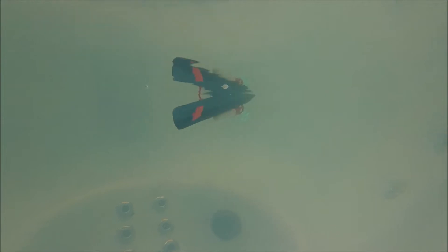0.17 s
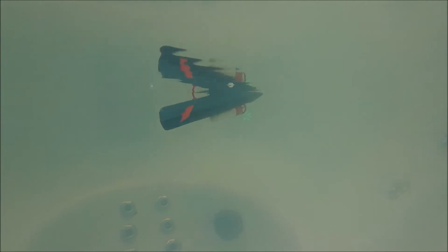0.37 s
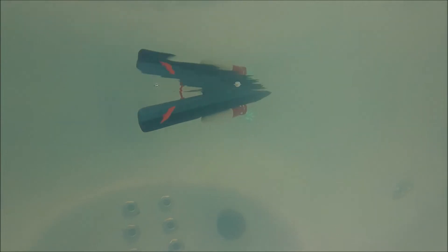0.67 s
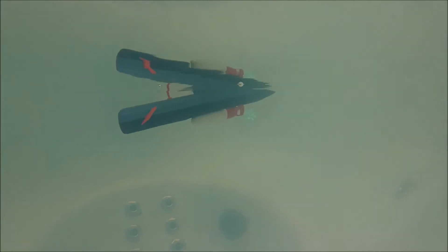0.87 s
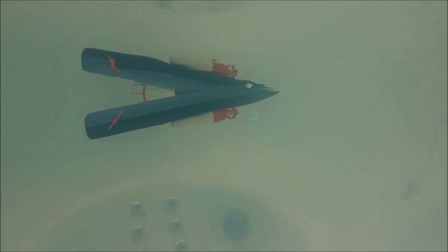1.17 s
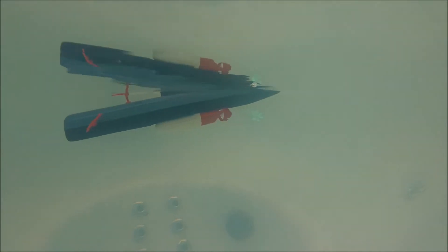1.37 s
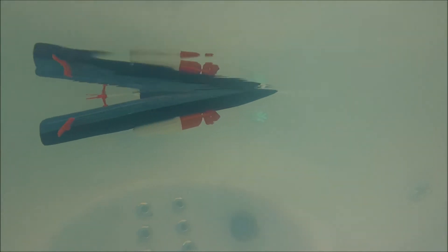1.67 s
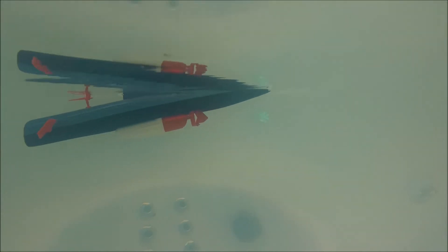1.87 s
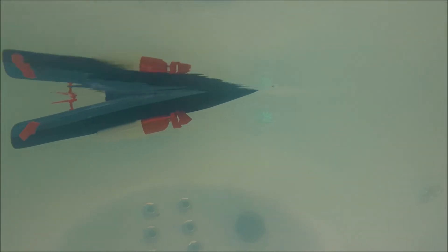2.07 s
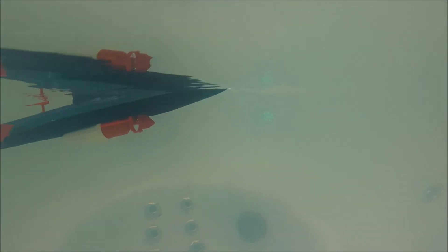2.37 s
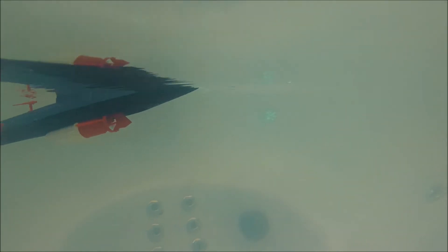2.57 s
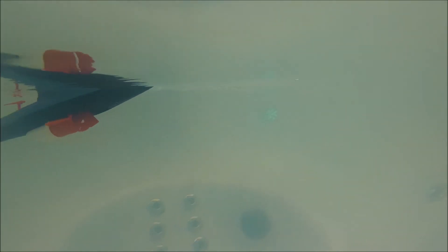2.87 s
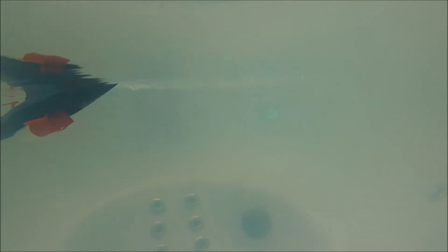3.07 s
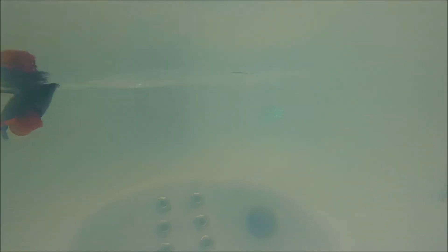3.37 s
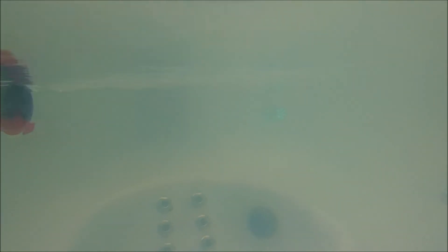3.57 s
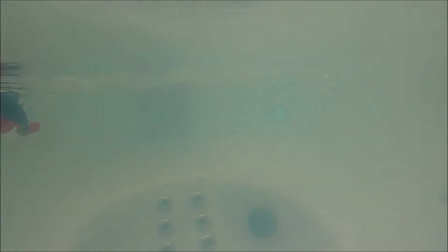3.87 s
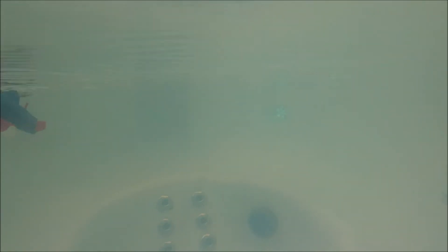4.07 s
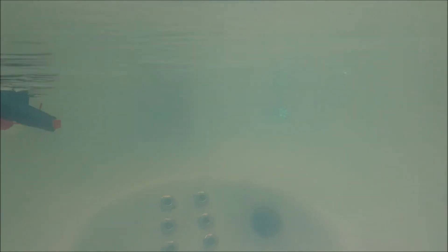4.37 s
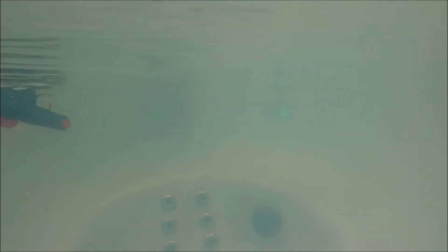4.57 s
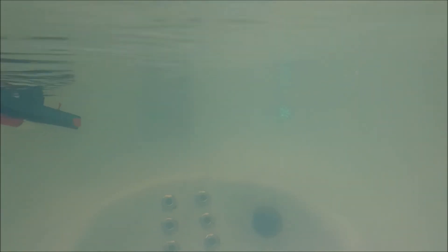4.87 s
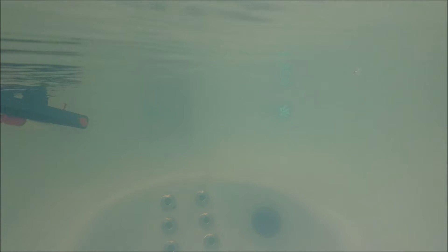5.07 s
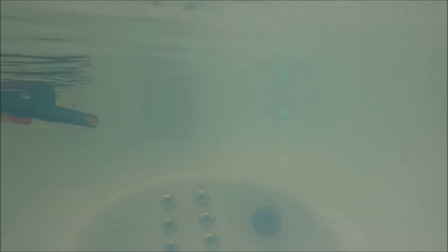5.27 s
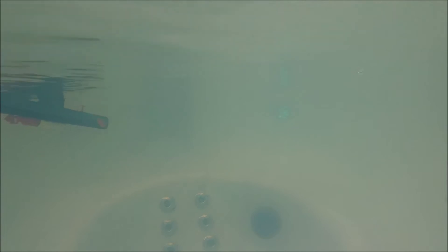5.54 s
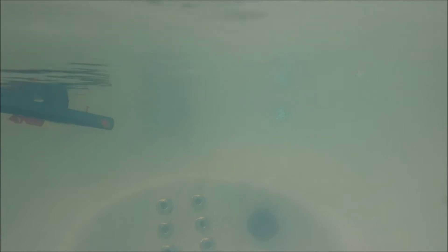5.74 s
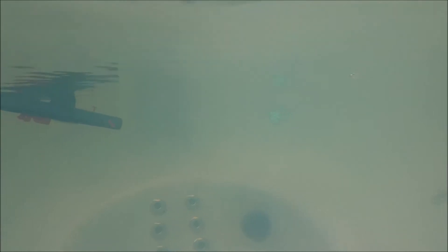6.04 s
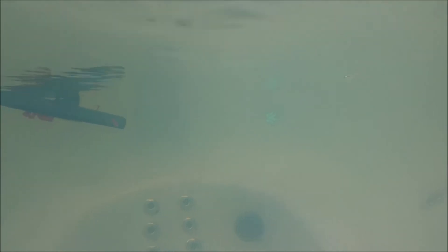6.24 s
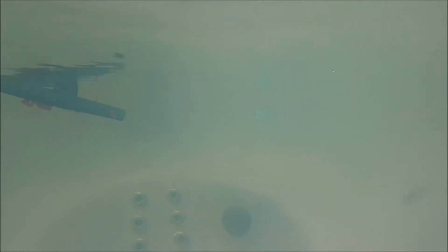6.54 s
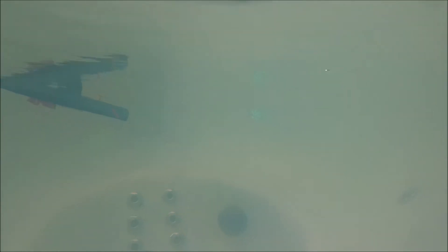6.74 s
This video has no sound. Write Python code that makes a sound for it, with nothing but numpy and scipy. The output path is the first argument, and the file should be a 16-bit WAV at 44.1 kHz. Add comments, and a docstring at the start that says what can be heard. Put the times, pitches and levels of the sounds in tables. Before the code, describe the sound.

A toy submarine's small motor runs throughout, heard underwater in a tub. Its loose gears rattle and ring the plastic hull, with a wavering whine and thin high tones above. The tone shifts as the boat passes close and turns round. Water bumps softly against the submerged microphone over a dull rush. Near the end, several sharp plinking clicks sound, one much louder than the rest.

```python
"""A toy submarine's motor, heard under water as the boat passes close to a camera in a tub and turns round.
The motor sings and rattles a loose gear train, whose teeth ring the plastic hull and gearbox while single
wheels whine; the ring changes as bow, beam and stern face the microphone. Water sways and bumps right
against the camera housing, and near the end a few sharp clicks plink through the tub."""
import sys
import numpy as np
from scipy import signal
from scipy.fft import rfft, irfft
from scipy.io import wavfile
from scipy.ndimage import uniform_filter1d, map_coordinates

SR = 44100
rng = np.random.default_rng(int(sys.argv[2]) if len(sys.argv) > 2 else 0)


def wrap_up_sound(samples):
    """Save the sound to the file named by the first command line argument, as 16-bit audio."""
    columns = np.atleast_2d(samples).T
    # keep every value between -1 and 1, then stretch to whole-number steps
    tamed = np.clip(columns, -1, 1)
    steps = np.round(tamed * 32767).astype(np.int16)
    wavfile.write(sys.argv[1], SR, steps)


N = 304554
T = np.arange(N) / SR
PASS_S = 2.06  # the boat is closest to the microphone


def undb(db):
    """Decibels to gain."""
    return 10 ** (np.asarray(db) / 20)


def unit(x):
    """Scale to rms 1."""
    return x / np.sqrt(np.mean(x ** 2))


def curve(rows):
    """Join (time [s], value) rows by straight lines."""
    return np.interp(T, *np.transpose(rows))


def walk(rate):
    """Smooth random drift of rms 1 that changes about rate times a second."""
    knots = rng.standard_normal(4096)
    return unit(map_coordinates(knots, [T * rate], order=2, mode="wrap"))


def noise(points):
    """Noise of rms 1, shaped by (frequency [Hz], relative level [dB]) points."""
    hz, db = np.transpose(points)
    f = np.fft.rfftfreq(N, 1 / SR)
    gain = undb(np.interp(np.log(f + 1), np.log(hz), db))
    return unit(irfft(rfft(rng.standard_normal(N)) * gain, N))


def ring(x, hz, width, db, size=8192):
    """Pass x through a body with steep-sided resonances; rms 1."""
    f = np.fft.rfftfreq(size, 1 / SR)[:, None]
    power = np.sum((undb(db) / (1 + ((f - hz) / width) ** 2)) ** 2, axis=1)
    cepstrum = irfft(np.log(power) / 2)
    cepstrum[1:size // 2] *= 2  # minimum phase: the ring follows the strike
    cepstrum[size // 2 + 1:] = 0
    response = irfft(np.exp(rfft(cepstrum)))
    return unit(signal.fftconvolve(x, response)[:N])


def radiate(x, modes, stern):
    """Ring a body that sounds different from each side; stern runs from 0 (bow on) to 1 (stern on)."""
    hz, width, *sides = np.transpose(modes)
    facing = stern * (len(sides) - 1)
    shares = [np.maximum(1 - abs(facing - k), 0) for k in range(len(sides))]
    return unit(sum(share * ring(x, hz, width, db) for share, db in zip(shares, sides)))


def struck(modes, t, rise_s, scale=1):
    """Damped (frequency, level [dB], t60 [s]) modes after a push; frequency times scale is in Hz."""
    ringing = sum(undb(db - 60 * t / t60) * np.sin(2 * np.pi * hz * scale * t) for hz, db, t60 in modes)
    return ringing * (1 - np.exp(-t / rise_s))


def motor(shaft_hz=43.64, wander=.012, wobble_db=2.5, pole_db=.8, rattle_db=2.5, close_s=1):
    """The passing motor drives loose gears; its load throbs once a turn and at each of three poles."""
    # side facing the microphone: (time [s], aspect [0 bow, 1 beam, 2 stern])
    aspect = [(1.8, 0.084), (2.6, 0.41), (3.2, 1), (3.8, 1.24), (4.45, 2)]
    stern = np.clip(curve(aspect) / 2, 0, 1)
    near = 1 / (1 + ((T - PASS_S) / close_s) ** 2)  # 1 at the closest point, towards 0 far off
    turns = np.cumsum(shaft_hz * (1 + wander * walk(4))) / SR
    throb_db = wobble_db * np.sin(2 * np.pi * turns) + pole_db * np.sin(6 * np.pi * turns)
    rattle = undb(rattle_db * bursts(rate=100, fade_s=.0046))
    strikes = teeth(turns, count=36) * rattle
    return (hull_ring(strikes, throb_db, stern) + gearbox(turns, throb_db, stern, near)
            + shell_hum(strikes, near) + song() + whines(turns))


def bursts(rate, fade_s):
    """The loose train rattles: random kicks, rate a second, die away and level off in a pile; rms 1."""
    kicks = (rng.random(N) < rate / SR) * 1.
    swell = signal.lfilter([1], [1, -np.exp(-1 / (fade_s * SR))], kicks)
    return unit(np.tanh(unit(swell - swell.mean()) / 2))


def teeth(turns, count, scatter_db=2.5, slop=.45, wear_share=.3):
    """Gear teeth strike count times a turn, each early or late in its play and with its own force."""
    chance = rng.standard_normal((16384, 3))
    wear = np.resize(rng.standard_normal((count, 3)), chance.shape)  # the same flaws on every turn
    late, flank, weight = (np.sqrt(wear_share) * wear + np.sqrt(1 - wear_share) * chance).T
    at_turn = (np.arange(len(late)) + slop * late) / count
    heard = (at_turn > 0) & (at_turn < turns[-1])
    force = np.sign(flank) * undb(scatter_db * weight)  # either flank may hit
    return unit(np.bincount(np.searchsorted(turns, at_turn[heard]), force[heard], N))


def hull_ring(strikes, throb_db, stern, throb_share=.5, trim_db=-1.4):
    """Tooth strikes ring the plastic hull; the ring swells midway, eases, then is loudest at the end."""
    # hull resonances: (frequency [Hz], half width [Hz], relative level from bow, beam, stern [dB])
    hull_modes = [(470, 130, -27.5, -24, -31.5), (766, 43, -21, -27, -41.5), (933, 26.3, -1, -3.5, -8),
                  (1008, 23, -11.5, -13, -4), (1073, 16, -19, -18, -3.5), (1140, 48.5, -6.5, -6.5, -10),
                  (1245, 43, -8, -6.5, -12.5), (1335.5, 28, -3, -3, -8.5), (1494, 62, -19.5, -27.5, -14.5),
                  (1603.4, 22.4, -24.5, -2, -8), (1857, 61, -12.5, -20, -23.5), (1981, 31, -34.5, -6, -7.5),
                  (2036, 25, -11.5, -25, -8.5), (2105, 44.6, -19.5, -7, -7.5)]
    # hull at the microphone: (time [s], level before trim and catches [dB])
    levels = [(.2, -46.5), (1.1, -44), (2.2, -42.5), (2.7, -40.5), (3.1, -40.5), (3.6, -40.5), (3.95, -43),
              (4.5, -44.5), (5.6, -43.5), (6.35, -43), (6.9, -38)]
    ringing = radiate(strikes * undb(throb_share * throb_db), hull_modes, stern)
    return steady(ringing) * undb(curve(levels) + trim_db + catches())


def steady(x, inertia_s=.04, share=.7, burst_s=.008, headroom_db=3.5):
    """The motor's inertia evens out a share of the swings in power; gear play caps bursts; rms 1."""
    power = uniform_filter1d(x ** 2, int(inertia_s * SR)) + 1e-9
    even = unit(x / power ** (share / 2))
    burst_rms = np.sqrt(abs(uniform_filter1d(even ** 2, int(burst_s * SR))))
    return unit(even / np.maximum(burst_rms / undb(headroom_db), 1))


def catches(slack_s=.043, rise_share=.2, settle_s=.0059):
    """Load on the gears in dB: they go slack, catch, rattle harder and settle."""
    # gear catches: (time [s], sag [dB], jolt [dB], hold [s])
    jolts = [(0.084, 1.5, 4, 0.021), (0.773, 4, 0.5, 0.09), (1.148, -1, 3, 0.022), (1.436, 3.5, 0.5, .03),
             (1.514, 3, 3.5, 0.04), (1.707, 3, 2, 0.037), (2.076, 4.5, 0, .03), (2.34, 4, 3, 0.0071),
             (2.994, 6, 1.5, 0.026), (3.435, 3, 2, .05), (3.56, 2.5, 1.5, 0.063), (3.729, 3.5, 2, 0.03),
             (4.006, 0.5, 3.5, 0.16), (4.258, 5, 5.5, .022), (4.354, 1.5, 6.5, .01), (4.383, 2.5, 4, .03),
             (4.553, 1, 3.5, .02), (4.63, 1, 6, 0.01), (5.197, 0.5, 3.5, 0.037), (6.722, 4, 5.5, .008)]
    load_db = np.zeros(N)
    for s, sag, jolt, hold in jolts:
        top = s + rise_share * hold  # long surges build more slowly
        times = [s - slack_s, s - slack_s / 2, s, top, top + hold, top + hold + settle_s]
        load_db += np.interp(T, times, [0, -sag, -sag, jolt, jolt, 0])
    return load_db


def gearbox(turns, throb_db, stern, near, rasp_db=2.5, level_db=-59.5, near_db=2.2, stern_db=1):
    """The finer wheels ring the gearbox in a hiss, louder from close by and from behind."""
    # gearbox resonances: (frequency [Hz], half width [Hz], relative level from bow, beam, stern [dB])
    gearbox_modes = [(2403, 63, 1.5, -0.5, -1), (2610, 58, 3.5, 3, 3.5), (2997, 69, -15, -5, 2),
                     (3092, 92, -1, -0.5, -2), (3487, 160, -4, -5, -4.5), (3808, 100, -4, -2.5, 0.5),
                     (4080, 90, -0.5, -1.5, 0), (4252, 130, -8.5, -3, -1.5), (4905, 560, -9, -6.5, -7.5),
                     (5450, 90, -5, -5, -4), (5915, 300, -6.5, -9, -6), (6620, 360, -10, -10, -10.5),
                     (7338, 174, -7.5, -7.5, -7.5)]
    rasp = teeth(turns, count=48) * undb(throb_db + rasp_db * bursts(rate=300, fade_s=.0033))
    hiss = tub_echoes(radiate(rasp, gearbox_modes, stern))
    return hiss * undb(level_db + near_db * near + stern_db * stern)


def tub_echoes(x, count=5, wall_gain=.3, shortest_s=.0017, longest_s=.008, stretch=.093, reach_s=1.8):
    """Echoes off walls and surface lag more as the boat nears, so ridges of tone sink and rise again."""
    near = 1 / np.hypot(1, (T - PASS_S) / reach_s)
    out = x.copy()
    for k, lag in enumerate(np.geomspace(shortest_s, longest_s, count)):
        delay = lag * (1 + stretch * near)
        out += (-1) ** k * wall_gain * map_coordinates(x, [(T - delay) * SR], order=2)
    return unit(out)


def shell_hum(strikes, near, closest_db=-59):
    """The strikes set the shell humming low, heard mostly close to the microphone."""
    return ring(strikes, hz=425, width=55, db=0) * near * undb(closest_db)


def song(hz=1326, waver_hz=5, jitter_hz=12, flutter_db=.5):
    """The motor sings: its gears hold a strong hull mode in a slightly wavering tone."""
    # tone at the microphone: (time [s], level before flutter and catches [dB])
    levels = [(.3, -57), (.8, -49), (1.6, -48.5), (2.1, -53.5), (2.6, -45.5), (3, -48.5), (3.3, -45.5),
              (3.7, -45.5), (4.1, -53), (4.6, -60.5)]
    pitch = hz + waver_hz * walk(8) + jitter_hz * walk(90)
    tone = unit(np.sin(2 * np.pi * np.cumsum(pitch) / SR))
    return tone * undb(curve(levels) + flutter_db * walk(40) + catches())


def whines(turns, kick_db=12, kick_turns=.23, rise_s=.0012, flutter_db=3.5, waver=.00152, rough_hz=26):
    """Single wheels, kicked once a shaft turn, ring out roughly and fade as the boat moves."""
    # wheel whines: (crest time [s], half length [s], pitch [Hz], glide [Hz/s], level [dB])
    wheels = [(.05, .25, 5370, -200, -63), (0.946, .4, 4130, -38, -63), (0.944, .3, 5900, 0.5, -69),
              (1.1, .35, 5070, 40, -69), (1.448, .25, 6100, -120, -70.5), (1.596, .8, 2680, -17.5, -63),
              (2.02, .25, 5780, -200, -63.5), (2.1, .6, 3930, -120, -67.5), (2.101, .7, 3110, -17.5, -70),
              (2.354, .2, 1603, 0.5, -57), (2.399, .4, 5380, -21.5, -67), (2.9, .3, 3830, -0.5, -67),
              (3.278, .3, 1596, -0.5, -52), (3.448, .5, 7380, 1.5, -68.5), (3.553, .4, 5400, 39, -67),
              (4.1, .22, 4160, 2.5, -61), (4.8, .33, 4130, 1.5, -59.5), (4.847, .25, 6000, 199, -65.5),
              (4.947, .35, 5400, 200, -63.5), (5.248, .3, 7020, 58, -66.5), (5.851, .45, 4084, -0.5, -63.5),
              (6.2, 0.9, 5905, 48.5, -67)]
    roughness, flutter, drift = walk(250), walk(60), walk(7)
    kick = undb(kick_db * np.exp(-(turns % 1) / kick_turns))
    pulse = unit(signal.lfilter([1], [1, -np.exp(-1 / (rise_s * SR))], kick))
    out = np.zeros(N)
    for s, length, hz, glide, db in wheels:
        on = np.flatnonzero(abs(T - s) < 2 * length + .2)
        own = (on + rng.integers(N)) % N  # every wheel has its own unsteadiness
        from_crest = T[on] - s
        pitch = hz * (1 + waver * drift[own]) + glide * from_crest + rough_hz * roughness[own]
        swell = np.exp(-(from_crest / length) ** 2) * undb(db + flutter_db * flutter[own])
        out[on] += swell * pulse[on] * np.sin(2 * np.pi * np.cumsum(pitch) / SR)
    return out


def water(sway_db=-56, rush_db=-55.5, bump_rise_s=.0068):
    """Water sways and bumps on the housing, right at the microphone, over the dull rush of the tub."""
    # waves against the housing: (crest time [s], half length [s], level [dB])
    swells = [(0.29, 0.05, -57), (3.318, 0.093, -50.5), (6.482, 0.44, -50.5)]
    # soft bumps of water: (time [s], level [dB], pitch [Hz])
    knocks = [(0.741, -35, 52), (1.16, -40.5, 45), (1.661, -34.5, 50), (3.411, -33, 48.5),
              (5.891, -35.5, 44), (6.708, -37, 40)]
    # ring of the housing: (frequency [multiple of the pitch], relative level [dB], t60 [s])
    housing_modes = [(1, 1.5, 0.13), (1.7, -0.5, .09), (2.8, -11, .06)]
    # rush of the still tub: (frequency [Hz], relative level [dB])
    rush_spectrum = [(20, -12), (45, -6.5), (80, -5.5), (150, -8.5), (300, -11), (600, -17), (1500, -15.5),
                     (4000, -29.5), (8000, -52.5)]
    sway = noise([(10, -7.5), (27, -6), (42, -3.5), (64, -16.5), (120, -25.5), (300, -52.5), (1000, -92)])
    waves = sum(undb(db) * np.exp(-((T - s) / length) ** 2) for s, length, db in swells)
    bumps = sum(undb(db) * struck(housing_modes, np.clip(T - s, 0, 1), bump_rise_s, hz)
                for s, db, hz in knocks)
    return sway * (undb(sway_db) + waves) + bumps + noise(rush_spectrum) * undb(rush_db)


def clicks(contact_s=.0003, after_rise_s=.0016, after_t60=.039, bend=.13, bend_s=.00041, size=4096):
    """Each click snaps and thuds, swells into a brief falling tone and leaves a lower ring in the water."""
    # clicks: (time [s], level [dB], pitch [Hz], swell [s], snap [Hz], snap [dB re tone],
    # after-ring [dB re tone], after-ring [Hz], after-ring lag [s])
    plinks = [(6.3, -27.5, 1090, 0.00087, 3000, -3.5, -11, 915, .0052),
              (6.3024, -30.5, 1200, 0.0011, 3000, -1.5, -12, 915, .0052),
              (6.364, -33, 720, 0.00077, 3000, -28, -13, 610, 0.0051),
              (6.5, -38, 1150, 0.00086, 5700, -6, -25, 980, .0052),
              (6.5542, -8, 1170, 0.0011, 4000, -12, -3.5, 1008, .0048),
              (6.6355, -18, 1407, 0.0031, 2260, -21, 1.5, 1304, 0.0068),
              (6.7664, -21.5, 1420, 0.003, 2300, -29, -1.5, 1157, 0.0065),
              (6.814, -31.5, 1120, 0.0034, 3270, -9, -7, 1060, 0.0071)]
    # ring of a snap: (frequency [multiple of the snap's], relative level [dB], t60 [s])
    snap_modes = [(.86, -3, 0.0097), (1.06, 3, 0.0062), (1.41, 0, 0.0047), (1.79, -10.5, 0.006)]
    # dull thud of the tub: (frequency [Hz], level [dB re tone], t60 [s])
    thud_modes = [(350, -21, 0.023), (691, -14.5, 0.026)]
    out, t = np.zeros(N + size), np.arange(size) / SR
    bent_t = t + bend * bend_s * (1 - np.exp(-t / bend_s))  # the pitch starts high and settles
    for s, db, hz, swell, snap_hz, snap_db, after_db, after_hz, lag in plinks:
        snap = undb(snap_db) * struck(snap_modes, t, contact_s, snap_hz)
        thud = struck(thud_modes, t, swell)
        tone = (t / swell * np.exp(1 - t / swell)) ** 2 * np.sin(2 * np.pi * hz * bent_t)
        after_ring = struck([(after_hz, after_db, after_t60)], np.maximum(t - lag, 0), after_rise_s)
        start = int(s * SR)
        out[start:start + size] += undb(db) * (snap + thud + tone + after_ring)
    return out[:N]


def scene():
    """Motor, water and clicks at one submerged microphone."""
    return (motor() + water() + clicks())[None]


def record(dry, top_hz=7750):
    """The treble ends steeply above about 7.7 kHz."""
    return signal.sosfilt(signal.ellip(10, .2, 70, top_hz, fs=SR, output="sos"), dry)


dry = scene()
out = record(dry)
wrap_up_sound(out)
```